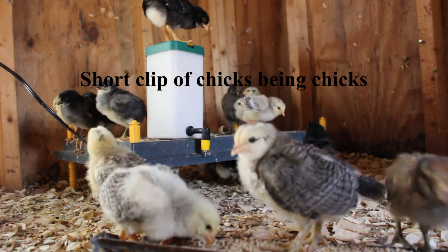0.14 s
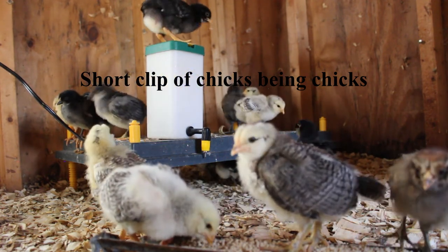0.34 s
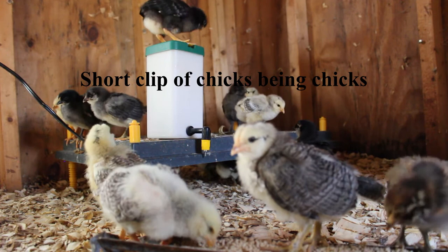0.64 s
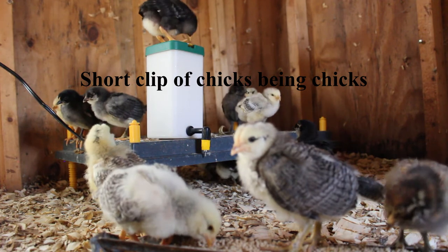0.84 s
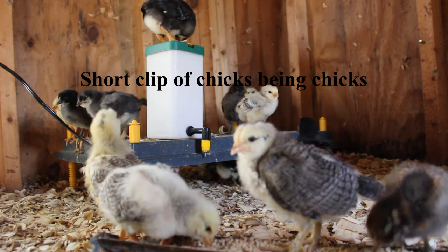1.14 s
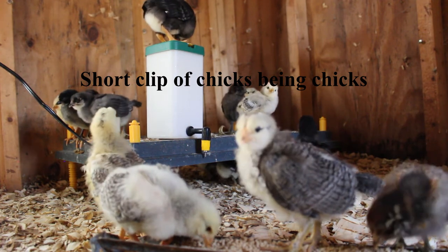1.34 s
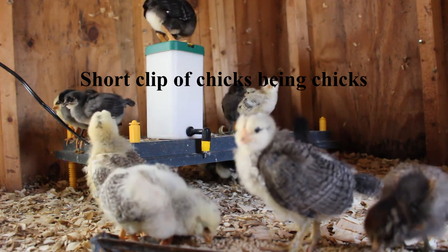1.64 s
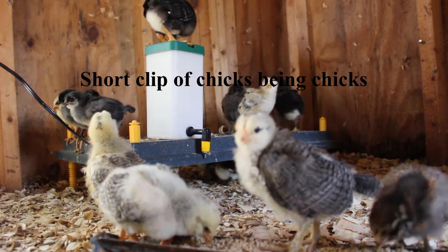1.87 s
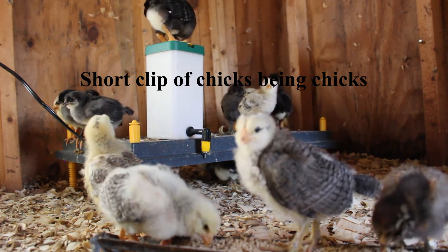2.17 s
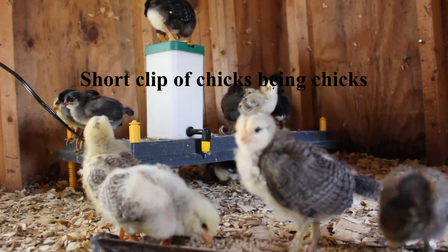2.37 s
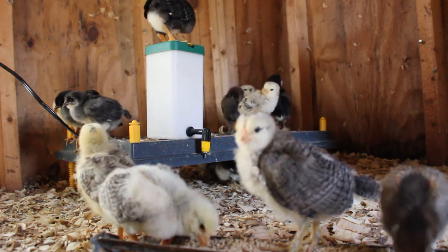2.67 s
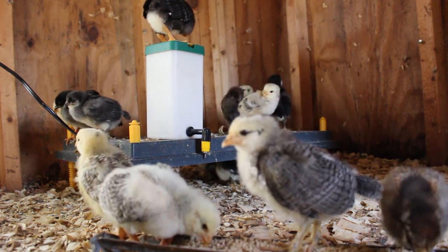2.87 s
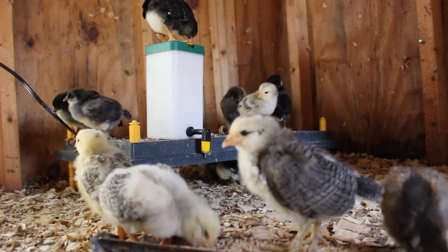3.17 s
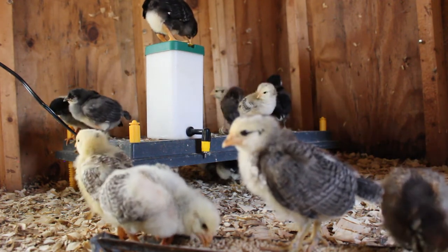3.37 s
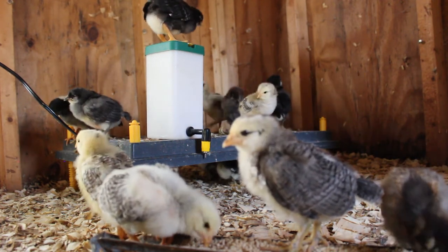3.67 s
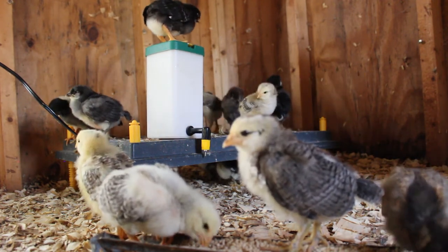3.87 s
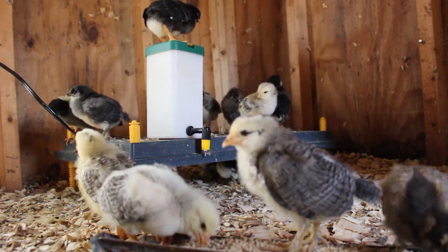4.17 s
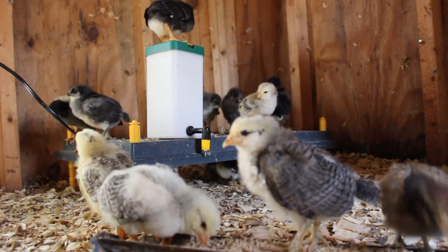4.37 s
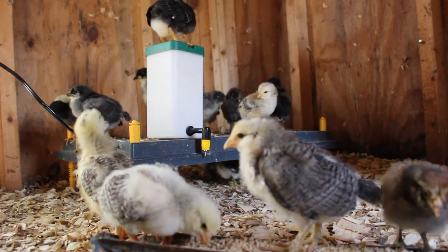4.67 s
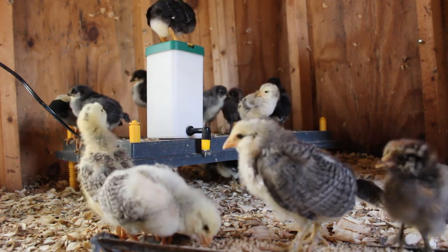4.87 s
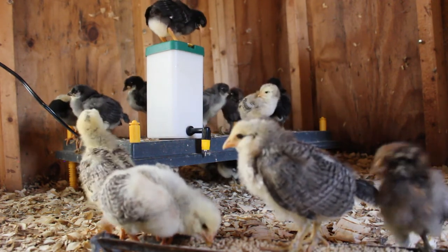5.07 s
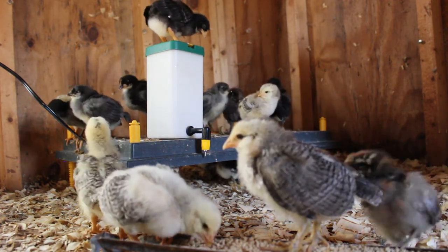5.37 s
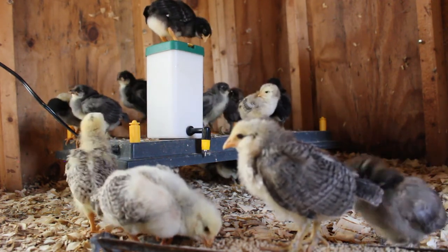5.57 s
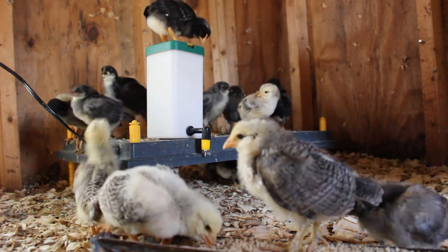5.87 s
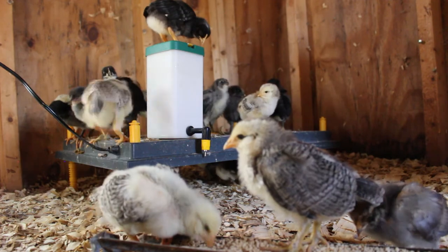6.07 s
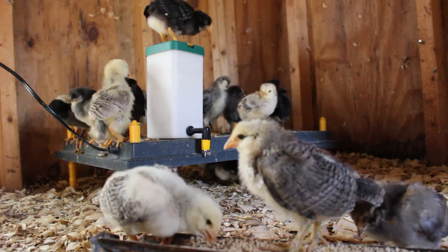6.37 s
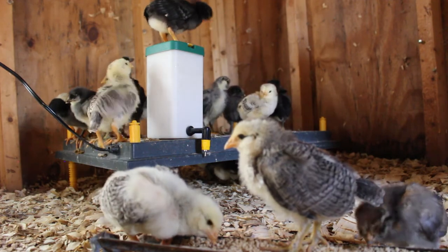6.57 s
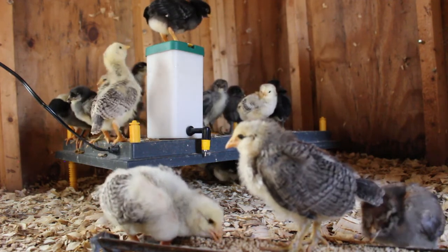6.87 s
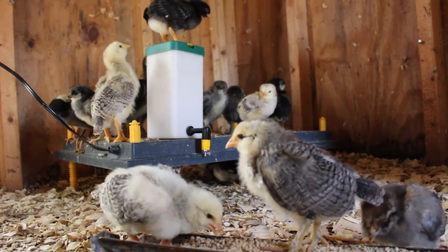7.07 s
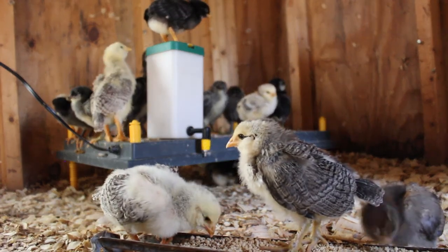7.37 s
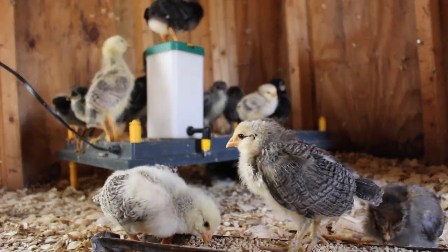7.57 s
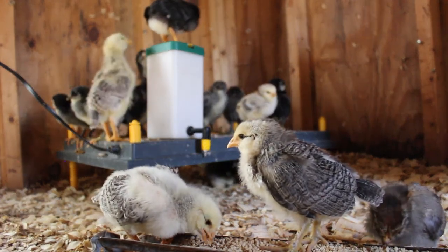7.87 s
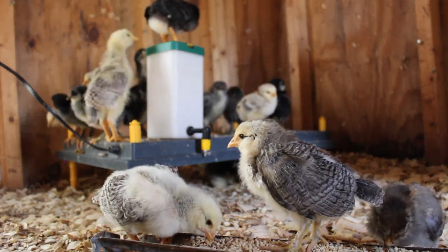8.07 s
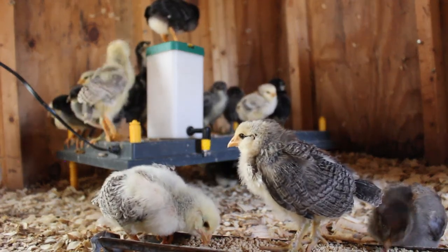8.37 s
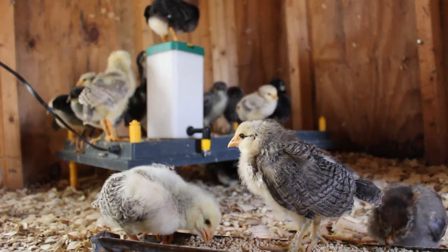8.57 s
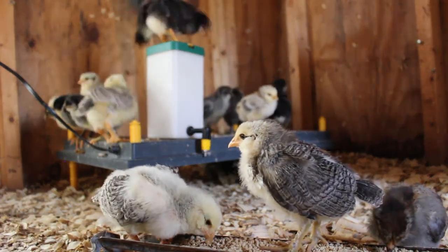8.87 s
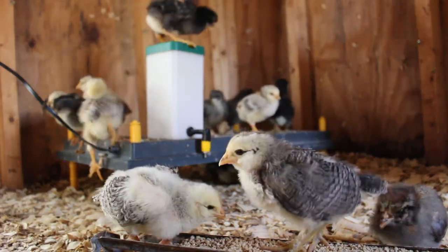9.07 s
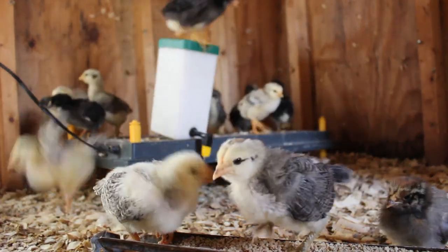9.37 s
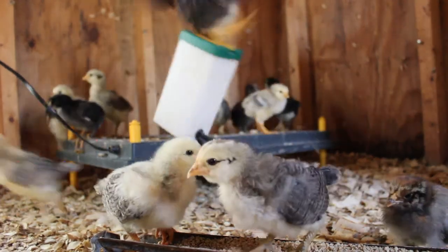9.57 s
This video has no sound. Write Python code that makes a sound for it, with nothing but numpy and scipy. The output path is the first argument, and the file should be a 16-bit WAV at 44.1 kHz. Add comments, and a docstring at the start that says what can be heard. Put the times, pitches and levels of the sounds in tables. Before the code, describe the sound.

In a small plank shed, faint outdoor rumble and hiss lie beneath dry, crackling shavings. A solid hollow thump with a low boom lands at 0.3 s, then light scratches, beak taps and plastic knocks follow irregularly. A distant bird gives nasal two-note calls at about 0, 2, 4.2 and 7 s. One tiny peep sounds at 1.4 s, with crisp kicks near 1.7 s. Thin, buzzy high whistles pass outside at 3-3.8 s as a far, low engine hum swells and stays. A clearer falling peep comes at 4 s, then sparse soft peeps, clustering from 6.2 to 7.1 s and continuing to 8.6 s; shuffling and a boomy landing rise around 6.65 s. From 8.8 s wings stir; from 9 to 9.7 s loud warbling alarm trills, sharp yips, rough flapping and scrambling surround hard hollow blows, strongest near 9.3 and 9.7 s, ending mid-commotion.

```python
"""Inside a small wooden shed: from the start, chicks scratch in shavings and knock on a hollow plastic perch,
while outside, beyond rumble and hiss, a far bird repeats a two-note call made of nasal overtones.
Soft falling peeps, gliding tones with wall echoes, begin after a second; from three seconds a thin whistle
of buzz-smeared tones joins in and an engine hum of a few low firing orders swells.
At the end come the fright's warbled trills and yips, noisy wingbeats, hard ringing blows and scrambling feet."""
import sys
import numpy as np
from scipy import signal
from scipy.fft import rfft, irfft, next_fast_len
from scipy.io import wavfile

SR = 44100
rng = np.random.default_rng(int(sys.argv[2]) if len(sys.argv) > 2 else 0)


def inscribe(sig):
    """Save sig as 16-bit PCM at rate SR to the path in sys.argv[1].

    A 1-D sig is mono; a 2-D sig holds one channel per row.
    Samples are clipped to [-1, 1] before scaling.
    """
    pcm = np.round(np.clip(np.atleast_2d(sig).T, -1, 1) * 32767)
    wavfile.write(sys.argv[1], SR, pcm.astype(np.int16))


N = 429093
TIME = np.arange(N) / SR


def amp(db):
    """Decibels to an amplitude factor."""
    return 10 ** (np.asarray(db) / 20)


def unit(x):
    """Scales to rms 1."""
    return x / np.sqrt(np.mean(x ** 2) + 1e-20)


def read(points, hz):
    """Reads a spectrum on a log-frequency axis."""
    f, value = np.transpose(points)
    return np.interp(np.log(hz + 1), np.log(f + 1), value)


def follow(rows, t=TIME):
    """The columns of a curve at the times t."""
    s, *columns = np.transpose(rows)
    return [np.interp(t, np.sort(s), c) for c in columns]


def progress(length):
    """Runs from 0 to 1 over length seconds."""
    return np.linspace(0, 1, int(length * SR))


def add(mix, s, sound):
    """Mixes a sound in at time s, cut to fit the mix."""
    start = round(s * SR)
    sound = sound[max(-start, 0):]
    part = mix[max(start, 0):][:len(sound)]
    part += sound[:len(part)]


def colour(x, spectrum):
    """Filters by a spectrum; rms 1."""
    size = next_fast_len(len(x))
    gain = amp(read(spectrum, np.fft.rfftfreq(size, 1 / SR)))
    return unit(irfft(rfft(x, size) * gain, size)[:len(x)])


def wander(size, hz):
    """Smooth chance of rms 1 that changes hz times a second."""
    t = np.arange(size) / SR * hz
    knots = rng.standard_normal(size // 16 + 4)
    return unit(np.interp(t, np.arange(len(knots)), knots))


def band(x, hz, kind):
    """A gentle low-pass or high-pass."""
    return signal.sosfilt(signal.butter(2, min(hz, .45 * SR), kind, fs=SR, output="sos"), x)


def dying_noise(spectrum, t60, size=16384):
    """A burst of dense resonances, each band dying at its own speed."""
    hz, t, z = signal.stft(colour(rng.standard_normal(size), spectrum), SR, nperseg=256)
    decay = amp(-60 * t / read(t60, hz)[:, None])
    return signal.istft(z * decay, SR, nperseg=256)[1][:size]


def struck(x, size=1323):
    """Scales a blow to rms 1 over its first moments (size in samples)."""
    return x / np.sqrt(np.mean(x[:size] ** 2))


def crackle(size, per_s, spread_db, hiss):
    """Tiny snaps of uneven size over a smooth sliding hiss."""
    happens = rng.random(size) < per_s / SR
    strength = amp(spread_db * np.minimum(rng.exponential(1, size), 4))
    snaps = happens * strength * rng.choice([-1, 1], size)
    return unit(snaps) + hiss * rng.standard_normal(size)


# decay of the tail between the plank walls: f/Hz, t60/s
SHED_DECAY = [(100, 0.29), (1000, 1), (3500, 0.65), (12000, 0.27)]


def shed(x, wet_db):
    """Close plank walls: sparse early reflections that merge into a short tail."""
    t = np.arange(16384) / SR
    tail = dying_noise([(100, -4.5), (8000, -10), (16000, 10)], SHED_DECAY) * (t > .004)
    walls = (rng.random(len(t)) < 450 / SR) * rng.choice([-1, 1], len(t))
    walls = walls * np.exp(-t / 0.014) * (t > .002)
    echo = 0.77 * tail / np.linalg.norm(tail) + 1.42 * walls / (np.linalg.norm(walls) + 1e-9)
    echo *= amp(wet_db)
    echo[0] = 1  # the direct sound
    return signal.oaconvolve(x, echo / np.linalg.norm(echo))


# spectrum of the air outdoors: f/Hz, relative level/dB
AIR_SPECTRUM = [(15, -26), (30, -8), (55, 7), (88, 15), (120, 3.5), (220, 1.5), (400, -3.5), (900, -5.5),
                (1800, -9.5), (4000, -10.5), (8000, -11.5), (16000, -22.5)]
AIR_DB = -55.5


def air(apart_db=-11):
    """Outdoor rumble and hiss; above the bass the two channels differ a little."""
    common, apart = (amp(AIR_DB) * colour(rng.standard_normal(N), AIR_SPECTRUM) for _ in range(2))
    return common + np.array([[1], [-1]]) * amp(apart_db) * band(apart, 270, "high")


# a far engine: t/s, mean firing rate f/Hz, level/dB before trim
ENGINE_CURVE = [(0, 41.9, -65), (3.2, 40.82, -64.5), (3.5, 41.37, -55.5), (4.3, 43.45, -54),
                (5.8, 42.82, -53.5), (7.6, 42.74, -53), (9.73, 42.73, -50.5)]


def engine(second_db=-2, third_db=-20, fourth_db=-18, trim_db=-2):
    """Only the lowest firing orders come through the walls."""
    hz, db = follow(ENGINE_CURVE)
    phase = 2 * np.pi * np.cumsum(hz * (1 + 0.0079 * wander(N, 4.6))) / SR
    levels = enumerate([0, second_db, third_db, fourth_db], 1)
    orders = sum(amp(k_db + 3.0 * wander(N, 4.7)) * np.sin(k * phase) for k, k_db in levels)
    return amp(db + trim_db) * np.sqrt(2) * orders


# the far two-note bird: t/s, delay of the second note/s, level/dB before trim
FAR_BIRD_CALLS = [(.01, 0.33, -56.5), (2.015, 0.31, -55.5), (4.219, .3, -54.5), (7.061, .324, -59)]
# its overtones, without a fundamental: multiple, mean relative level/dB
FAR_BIRD_OVERTONES = [(2, 6.5), (3, 2), (4, -20.5), (6, -13), (7, -26)]
FAR_HZ = 931  # silent fundamental at the top of the arch
FAR_FIRST_S, FAR_SECOND_S = .23, .2  # lengths of the two notes


def far_bird(arch=0.0563, yard_t60=0.95, echo_db=-4, trim_db=-1):
    """Nasal notes that arch in pitch and linger in the echo of the yard."""
    out = np.zeros(N)
    notes = []
    for s, gap, db in FAR_BIRD_CALLS:
        notes += [(s, FAR_FIRST_S, db), (s + gap, FAR_SECOND_S, db)]
    for s, length, db in notes:
        u = progress(length)
        pitch = FAR_HZ * (1 - arch * (2 * (u - .42)) ** 2 + 0.0056 * wander(len(u), 123))
        phase = 2 * np.pi * np.cumsum(pitch) / SR
        note = sum(amp(k_db + 4.3 * wander(len(u), 31.0)) * np.sin(k * phase)
                   for k, k_db in FAR_BIRD_OVERTONES)
        note = amp(db + trim_db) * unit(note) * signal.windows.tukey(len(u), .4)
        yard = dying_noise([(100, 0), (16000, 0)], [(100, yard_t60), (16000, yard_t60)])
        add(out, s, note)
        add(out, s + .02, amp(echo_db) * signal.oaconvolve(note, yard / np.linalg.norm(yard)))
    return out


# the thin whistle outside: t/s, length/s, start f/Hz, end f/Hz, level/dB before trim
WHISTLE_NOTES = [(3.006, 0.32, 6600, 6700, -64.5), (3.47, .24, 6850, 6500, -72),
                 (3.599, 0.26, 6650, 6100, -62.5)]


def whistle(width_hz=260, trim_db=2):
    """A songbird's thin sliding notes, smeared to a narrow band by their fast buzz."""
    out = np.zeros(N)
    for s, length, start_hz, end_hz, db in WHISTLE_NOTES:
        u = progress(length)
        buzz = rng.standard_normal(len(u)) + 1j * rng.standard_normal(len(u))
        buzz = band(buzz, width_hz, "low")
        turns = np.cumsum(start_hz + (end_hz - start_hz) * u) / SR
        note = unit((buzz * np.exp(2j * np.pi * turns)).real)
        add(out, s, amp(db + trim_db) * np.sin(np.pi * u) * note)
    return out


# restless shuffling of the brood: t/s, level/dB before trim
SHUFFLE_CURVE = [(0.0, -59.5), (0.83, -57.5), (1.07, -61), (1.41, -60), (1.73, -53.5), (1.97, -61),
                 (2.26, -62), (2.48, -55.5), (3.48, -68.5), (3.7, -60), (5.73, -53), (6.46, -58.5),
                 (6.65, -51.5), (6.97, -52.5), (7.72, -59), (8.21, -56), (8.46, -60.5), (8.75, -55.5)]
# single kicks: t/s, level/dB before trim, length/s (peak at a third of it), lift of the top treble/dB
KICKS = [(0.312, -51, 0.1, -3), (0.712, -48, 0.097, 0), (1.601, -44.5, 0.0084, -7),
         (1.651, -39, 0.0073, -4), (1.717, -49, 0.082, -4), (1.787, -40.5, 0.02, -4),
         (2.251, -52, 0.085, -2), (2.652, -54, 0.14, -1), (2.883, -51.5, 0.085, 0), (3.097, -55, 0.034, 8),
         (3.293, -53, .008, 14), (3.566, -49, 0.01, 19), (4.078, -44.5, 0.042, -7), (5.097, -46, 0.01, 2),
         (5.109, -44.5, 0.035, -6), (5.791, -49.5, 0.027, -3), (6.039, -45.5, 0.039, -8),
         (6.148, -47, 0.022, 6), (6.365, -46, 0.017, 6), (6.859, -48.5, 0.042, 0), (8.107, -48, 0.069, -18),
         (8.153, -47.5, 0.04, 2), (8.249, -46, 0.023, -3), (8.873, -39.5, 0.028, -9), (8.964, -35, .01, 15),
         (9.275, -40, 0.02, -5), (9.489, -34, 0.012, 10), (9.63, -26, 0.045, 18), (9.68, -27, 0.014, 7)]
# spectrum of the dry flakes: f/Hz, relative level/dB
FLAKE_SPECTRUM = [(200, -7.5), (600, 3.5), (1000, 2.5), (1500, 2), (2600, 2), (4500, 1), (6500, 1.5),
                  (8300, 1.5), (10000, -1.5), (13000, 0.5), (16000, -4.5)]


def shavings(shuffle_db=1, kick_db=1, clump_db=3.0):
    """Dry flakes crackle in clumps under shuffling feet, with a separate burst at each kick."""
    level = follow(SHUFFLE_CURVE)[0] + shuffle_db + clump_db * wander(N, 55)
    out = amp(level) * colour(crackle(N, 2500, 5.1, 0.87), FLAKE_SPECTRUM)
    for s, db, length, crisp in KICKS:
        u = np.arange(int(3 * length * SR)) / (length * SR / 3)
        flakes = colour(crackle(len(u), 6000, 3.6, 0.22), FLAKE_SPECTRUM)
        flakes = colour(flakes, [(9000, 0), (12500, crisp)])
        add(out, s, amp(db + kick_db) * u * np.exp(1 - u) * flakes)
    return out


# sharp taps of beak and claw: t/s, level/dB before trim, treble/dB before trim
PECK_TAPS = [(0.793, -43.5, -13), (0.853, -52, -9), (1.613, -49, -14), (2.337, -52, -4), (2.544, -65, 2),
             (3.263, -60, -3), (3.465, -60, -21), (6.144, -53, -22), (6.437, -50, -3), (6.627, -41.5, -28),
             (6.867, -55, 7), (7.878, -49, -7), (8.057, -53.5, -25), (8.091, -40, -4), (8.16, -50, -7),
             (8.268, -41, -6), (9.059, -34, -21)]
# spectrum of a tap before its treble is set: f/Hz, relative level/dB
TAP_SPECTRUM = [(100, -14), (700, -12), (1300, -5), (1900, -5.5), (2250, 0), (2600, -1), (2900, -11),
                (3600, -4.5), (5000, -9.5), (8000, -20), (10000, -28), (16000, -30)]


def pecks(t60=0.11, bright_hz=4500, bright_db=8.5, trim_db=1, crack=4.5):
    """Hard little taps: a crack, then a short, high ring."""
    out, t = np.zeros(N), np.arange(4096) / SR
    for s, db, bright in PECK_TAPS:
        spectrum = [(hz, tap_db + (bright + bright_db) * (hz > bright_hz)) for hz, tap_db in TAP_SPECTRUM]
        tap = dying_noise(spectrum, [(100, t60), (16000, t60)], size=4096)
        tap *= 1 + crack * np.exp(-t / 0.0033)
        add(out, s, amp(db + trim_db) * struck(tap, size=882))
    return out


STEPS_PER_S, STEP_DB, STEP_SPREAD_DB = 1.8, -63, -2.5  # level before the trim of the knocks
STEP_BASS_DB, STEP_TREBLE_DB, STEP_HZ = -12, -20, 885  # before trim; middle of the ring's one-octave range


def steps():
    """Light footfalls at random moments, as rows like those of the knocks."""
    draws = rng.random((round(STEPS_PER_S * N / SR), 3))
    return [(a * N / SR, STEP_DB + STEP_SPREAD_DB * (2 * b - 1),
             STEP_BASS_DB, STEP_TREBLE_DB, STEP_HZ * 2 ** (c - .5)) for a, b, c in draws]


# feet and bodies landing on the perch: t/s, level/dB, bass/dB, treble/dB (all before trim), strongest ring f/Hz
LANDINGS = [(0.296, -30.5, 0, -6.5, 664), (0.86, -38, -8.5, -12, 880), (1.134, -55.5, -20, -2, 1130),
            (1.574, -55.5, -12, -2, 870), (1.894, -45, -1, -9, 930), (2.005, -54.5, 1, -10, 960),
            (3.301, -55, -4, -3, 1120), (3.571, -54.5, -1, -10, 990), (3.616, -52.5, -2, -1, 790),
            (3.922, -49, -1.5, -5, 460), (4.41, -51, -6, -7, 1090), (4.572, -43, -7, -21, 640),
            (4.824, -54.5, -19, -6, 1100), (4.958, -53.5, -6, -22, 1030), (5.278, -53, -23, -17, 910),
            (5.639, -55.5, -16, -2, 940), (6.654, -45.5, 6, 4, 344), (6.666, -44.5, 4.5, -7, 1090),
            (6.825, -52.5, -7, -21, 770), (7.043, -48.5, 0, -9, 1010), (7.747, -57.5, -2, -15, 1010),
            (7.879, -46.5, -9.5, 2, 1370), (8.271, -47, -28, 4, 930), (8.617, -49.5, -6, -2, 438),
            (8.877, -38.5, 2.5, -26, 610), (8.905, -48, -3, -4, 326), (8.976, -45.5, -8, 6, 690),
            (9.021, -40.5, -10, -21, 1020), (9.136, -35, -3, -5, 750), (9.158, -41, -7, -15, 675),
            (9.207, -33, -3, -21, 388), (9.223, -32, -7, -8, 386), (9.274, -17.5, -7.5, -5.5, 320),
            (9.461, -34.5, 1.5, -3, 377), (9.517, -37, 1, 3, 400), (9.627, -29, 3, -3, 670),
            (9.644, -23, 0, -6.5, 680), (9.688, -21.5, 1, -1, 670), (9.703, -25.5, -16, -1, 644)]
# modes of the hollow perch: nominal f/Hz, mean relative level/dB, t60/s
PERCH_MODES = [(85.8, -20, 0.51), (164, -12, 0.14), (241.7, -2.5, 0.1), (313.5, -7, 0.089),
               (371, -3, 0.076), (635.5, -11, 0.11), (721.5, 1, 0.034), (791, -6, 0.041), (928, -3, 0.035),
               (1068, -2.5, 0.049), (1376, -2.5, 0.019), (1640, -29, 0.04), (2053, -4, 0.057),
               (2760, -17, 0.027)]
# spectrum of the dull thud before the contact shapes it: f/Hz, relative level/dB
THUD_SPECTRUM = [(50, -23), (90, 9), (120, -19), (170, -19.5), (250, -7), (380, 3), (500, -2.5), (650, 1),
                 (1200, -5.5), (1600, -5), (2300, -3), (3500, -9.5), (5000, -15), (16000, -24)]
# decay of the thud: f/Hz, t60/s
THUD_DECAY = [(90, 0.34), (130, 0.51), (380, 0.25), (650, 0.098), (1000, 0.18), (3000, 0.14),
              (12000, 0.081)]


def knocks(ring_db=-1, thud_db=-2, trim_db=1, focus_db=8, focus_octaves=0.32, bass_db=0, sub_db=4, treble_db=3):
    """A blow rings the perch; each landing picks the strongest modes and the share of bass and treble."""
    out, t = np.zeros(N), np.arange(16384) / SR
    grid = np.geomspace(30, 16000, num=120)
    for s, db, bass, treble, ring_hz in LANDINGS + steps():
        tilt = read([(100, bass + sub_db), (200, bass + bass_db), (350, bass + bass_db), (600, 0),
                     (1300, 0), (2100, treble + treble_db), (5000, treble - 2)], grid)
        focus = focus_db * np.exp(-(np.log2(grid / ring_hz) / focus_octaves) ** 2)
        contact = np.transpose([grid, tilt + focus])
        ring = np.zeros(len(t))
        # each blow varies the modes' levels, tuning and signs
        for (hz, mode_db, t60), (a, b) in zip(PERCH_MODES, rng.standard_normal((len(PERCH_MODES), 2))):
            decay = amp(mode_db + read(contact, hz) + 1.96 * a - 60 * t / t60)
            rise = 1 - np.exp(-t * hz / 0.53)  # low modes build up more slowly
            ring += decay * rise * np.sign(b) * np.sin(2 * np.pi * hz * (1 + 0.014 * b) * t)
        thud = dying_noise(np.transpose([grid, read(THUD_SPECTRUM, grid) + tilt + focus]), THUD_DECAY)
        thud *= 1 + 0.59 * np.exp(-t / 0.007)  # the first crack stands above the ring
        blow = amp(ring_db) * struck(ring) + amp(thud_db) * struck(thud)
        add(out, s, amp(db + trim_db) * shed(blow, wet_db=-20.5))
    return out


# heavy landings that set a panel booming: t/s, level/dB before rise and decay
BOOM_HITS = [(.298, -33.5), (6.65, -44)]
BOOM_START_HZ, BOOM_END_HZ, BOOM_GLIDE_S = 649.5, 88.8, .022
BOOM_RISE_S, BOOM_T60 = 0.029, 0.47  # both in seconds


def booms():
    """A heavy landing bends a thin panel: its slow, low waves arrive last, so the boom glides down."""
    out, t = np.zeros(N), np.arange(16384) / SR
    hz = BOOM_END_HZ + (BOOM_START_HZ - BOOM_END_HZ) * np.exp(-t / BOOM_GLIDE_S)
    envelope = (1 - np.exp(-t / BOOM_RISE_S)) * amp(-60 * t / BOOM_T60)
    boom = np.sqrt(2) * np.sin(2 * np.pi * np.cumsum(hz) / SR) * envelope
    for s, db in BOOM_HITS:
        add(out, s, amp(db) * boom)
    return out


# the fright: t/s, feather rustle level/dB, pushed air level/dB (both before trim)
FLURRY_CURVE = [(8.78, -70, -48), (8.8, -55, -61), (8.896, -50, -38.5), (8.958, -47.5, -38),
                (9.272, -42, -35.5), (9.28, -35, -41), (9.35, -44.5, -35.5), (9.454, -39.5, -43),
                (9.628, -38, -24), (9.64, -34, -28), (9.674, -28.5, -28), (9.73, -32, -27)]
# spectrum of rubbing feathers: f/Hz, relative level/dB
FEATHER_SPECTRUM = [(300, 0), (1200, 10), (2500, 0), (4500, 2.5), (7000, 2), (8500, 4), (10000, -7.5),
                    (13000, 1), (16000, -11)]
# spectrum of the pushed air: f/Hz, relative level/dB
WING_AIR_SPECTRUM = [(20, -23), (50, -22), (90, 8.5), (120, -3.5), (165, -2), (380, -6), (520, -11.5),
                     (700, -7.5), (1100, -17.5), (2000, -13.5), (3500, -25), (7000, -32.5)]


def wings(beat_hz=24, beat_db=2, flutter_db=3, rustle_db=3.5, air_db=-2):
    """Uneven wingbeats push air and rub feathers, harder as the fright spreads."""
    rustle, pushed = follow(FLURRY_CURVE)
    turns = np.cumsum(beat_hz * (1 + 0.247 * wander(N, 9.3))) / SR
    beat = beat_db * np.cos(2 * np.pi * turns)
    feathers = colour(crackle(N, 3000, 4.8, 0.65), FEATHER_SPECTRUM)
    feathers *= amp(rustle + rustle_db + beat + flutter_db * wander(N, 220))
    puffs = colour(rng.standard_normal(N), WING_AIR_SPECTRUM)
    puffs *= amp(pushed + air_db + beat + flutter_db * wander(N, 90))
    return (feathers + puffs) * (TIME > FLURRY_CURVE[0][0])


# harmonics of a chick's voice: multiple, relative level/dB before strain scales it
VOICE_HARMONICS = [(1, 0.5), (2, -19), (3, -33)]
PEEP_EDGE_S, ALARM_EDGE_S = 0.0068, 0.0007  # rise and fall of a relaxed and of a forced call


def voice(s, hz, db, wet_db, jitter=0.012, overtone_db=0, flutter_db=2.8, rasp=0.15, rasp_hz=700):
    """A near-pure gliding tone with the wall echoes of its own spot; forced, a second vibration adds side tones."""
    t = np.arange(len(hz)) / SR
    strain = np.clip((db + 43.5) / 20, 0, 1)  # louder calls are more forced
    phase = 2 * np.pi * np.cumsum(hz * (1 + jitter * (1 + 2 * strain) * wander(len(t), 711))) / SR
    tone = sum(amp(k_db * (1.5 - 0.53 * strain) + overtone_db * (k > 1)) * np.sin(k * phase)
               for k, k_db in VOICE_HARMONICS)
    rasp_phase = 2 * np.pi * np.cumsum(rasp_hz * (1 + 0.246 * wander(len(t), 149))) / SR
    tone *= 1 + rasp * strain * np.sin(rasp_phase)
    edge_s = np.interp(strain, [0, 1], [PEEP_EDGE_S, ALARM_EDGE_S])
    ends = np.clip(np.minimum(t, t[-1] - t) / edge_s, 0, 1)
    return s, shed(unit(tone) * ends * amp(db + flutter_db * wander(len(t), 378)), wet_db)


# soft peeps: t/s, length/s, start f/Hz, end f/Hz, starting level/dB
SOFT_PEEPS = [(1.375, .024, 3590, 2800, -47), (4.041, 0.0334, 3120, 2464, -36),
              (4.37, 0.02, 2800, 3050, -50), (4.676, 0.021, 3050, 2850, -45.5),
              (5.279, 0.039, 3150, 2875, -48.5), (6.185, 0.047, 4120, 2820, -45),
              (6.313, 0.027, 3340, 2970, -46), (6.442, 0.031, 4080, 2800, -48),
              (6.57, 0.027, 3850, 2800, -45.5), (6.648, .026, 2740, 2540, -43.5),
              (6.667, 0.027, 2560, 2920, -44.5), (7.024, .032, 4330, 4040, -42.5),
              (7.057, 0.025, 3990, 3100, -49), (7.31, 0.045, 4280, 2780, -48),
              (7.789, 0.031, 3320, 3100, -58), (7.824, 0.031, 2810, 3150, -43),
              (8.335, 0.038, 2980, 2720, -49.5), (8.582, .022, 3700, 4060, -53.5)]
PEEP_SAG_DB = -1.5  # level change from start to end


def peeps(wet_db=-7):
    """Contented peeps: one smooth slide from pitch to pitch, mostly downwards."""
    out = np.zeros(N)
    for s, length, start_hz, end_hz, db in SOFT_PEEPS:
        u = progress(length)
        hz = start_hz + (end_hz - start_hz) * np.sin(np.pi * u / 2) ** 2
        add(out, *voice(s, hz, db + PEEP_SAG_DB * u, wet_db))
    return out


# alarm trills: t/s, length/s, centre f/Hz, swing f/Hz, entry offset f/Hz, level/dB before trim
ALARM_TRILLS = [(9.028, .107, 3613, 592, 700, -21.5), (9.182, 0.061, 3710, 440, 0, -25.5),
                (9.253, 0.074, 3640, 647, -500, -25)]
TRILL_HZ, TRILL_UNEVEN = 41.94, 0.16  # swings a second; unevenness of their width
TRILL_ENTRY_S, TRILL_SAG = .005, 0.0556  # time to settle on its pitch; share of pitch lost over a trill
TRILL_FADE_DB, TRILL_ENDS_DB = -4.5, -11  # level change over a trill; extra level at both ends
TOP_DIP_DB_PER_OCTAVE = -9  # a trill thins out as its pitch climbs


def trills(wet_db=-6, trim_db=-1):
    """Alarm trills from the back of the shed: the pitch settles, then swings fast as the call swells and fades."""
    out = np.zeros(N)
    for s, length, centre_hz, swing_hz, entry_hz, db in ALARM_TRILLS:
        u = progress(length)
        t = u * length
        swing = swing_hz * (1 + TRILL_UNEVEN * wander(len(u), 59.4)) * np.cos(2 * np.pi * TRILL_HZ * t)
        entry = entry_hz * np.exp(-(t / TRILL_ENTRY_S) ** 2)
        hz = (centre_hz + swing + entry) * (1 - TRILL_SAG * (u - .5))
        loud = db + trim_db + TRILL_FADE_DB * (u - .5) + TRILL_ENDS_DB * (2 * u - 1) ** 6
        loud += TOP_DIP_DB_PER_OCTAVE * np.log2(hz / centre_hz)
        add(out, *voice(s, hz, loud, wet_db, jitter=0.0037, overtone_db=2.5, rasp=.1))
    return out


# startled yips: t/s, length/s, top f/Hz, foot f/Hz, end level/dB before trim
STARTLED_YIPS = [(9.058, .013, 2507, 2420, -8.5), (9.279, 0.012, 2850, 2510, -15),
                 (9.407, .027, 4200, 2510, -17), (9.55, .029, 4230, 2490, -18),
                 (9.583, 0.02, 3650, 2910, -22.5), (9.682, .031, 3900, 2594, -12.5),
                 (9.708, 0.023, 3480, 3060, -8.5)]
YIP_SWELL_DB = 9.5  # a yip grows louder towards its falling end
YIP_TOP_DIP_DB = -10.5  # and thins out at the top of its arch


def yips(wet_db=-5, trim_db=-1):
    """Startled yips: a single arch of pitch, loudest as it falls."""
    out = np.zeros(N)
    for s, length, top_hz, foot_hz, db in STARTLED_YIPS:
        u = progress(length)
        hz = foot_hz + (top_hz - foot_hz) * np.sin(np.pi * u)
        loud = db + trim_db + YIP_SWELL_DB * (u - 1) + YIP_TOP_DIP_DB * np.sin(np.pi * u) ** 4
        add(out, *voice(s, hz, loud, wet_db, jitter=0.0074, overtone_db=2))
    return out


def scene():
    """The brood in the shed, over the faint sounds from outside."""
    outside = air() + engine() + far_bird() + whistle()
    litter = shed(shavings() + pecks() + wings(), wet_db=-12.0)[:N]
    return outside + litter + knocks() + booms() + peeps() + trills() + yips()


EDGE_HZ = 15900


def record(dry):
    """The recorder's band limit: a steep low-pass behind the microphones."""
    lowpass = signal.firwin(511, EDGE_HZ, window=("kaiser", 9), fs=SR)
    return signal.oaconvolve(dry, lowpass[None], "same", axes=1)


dry = scene()
out = record(dry)
inscribe(out)
```